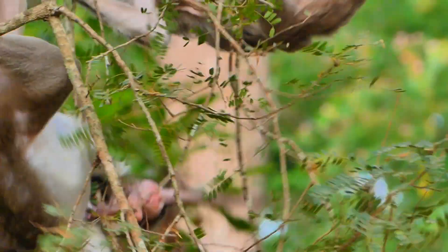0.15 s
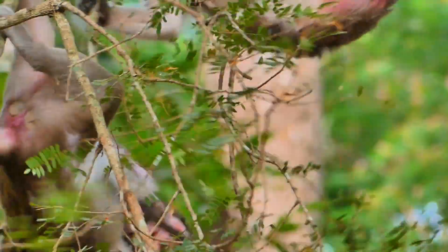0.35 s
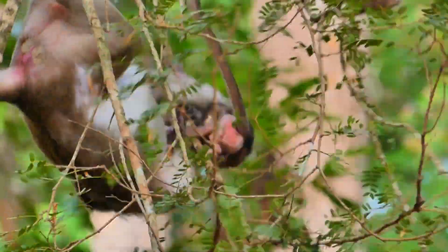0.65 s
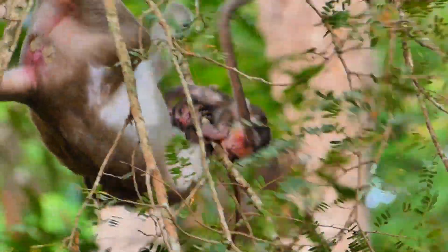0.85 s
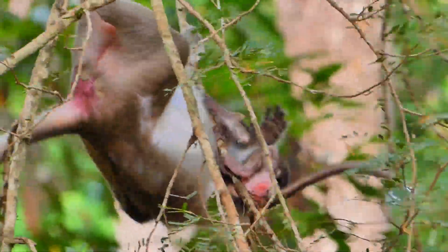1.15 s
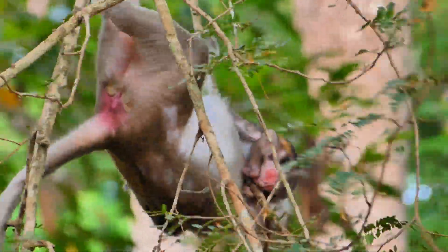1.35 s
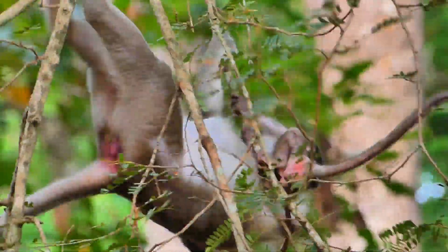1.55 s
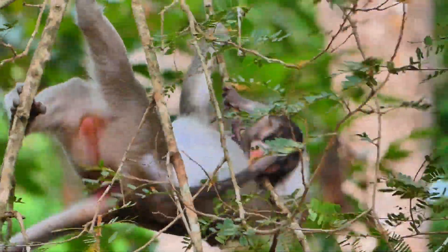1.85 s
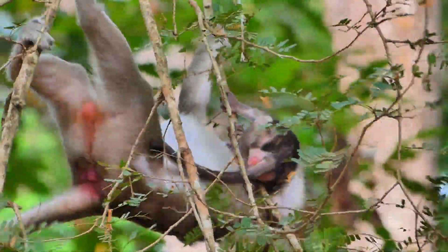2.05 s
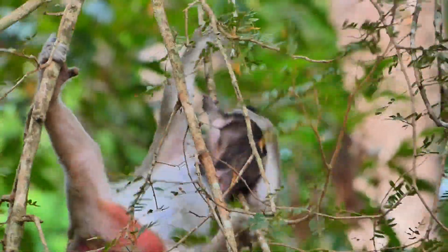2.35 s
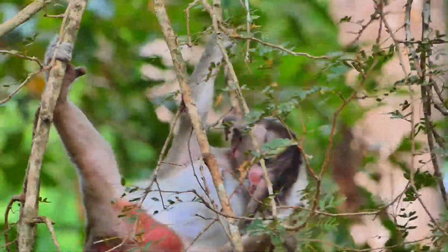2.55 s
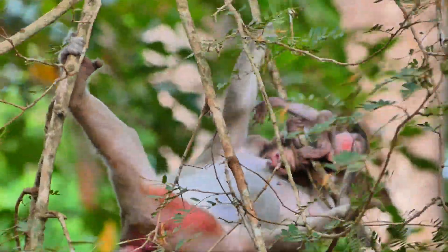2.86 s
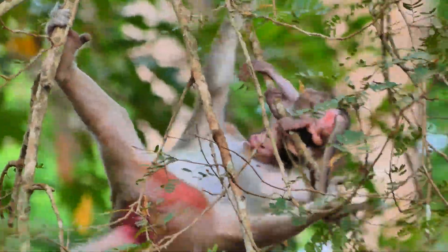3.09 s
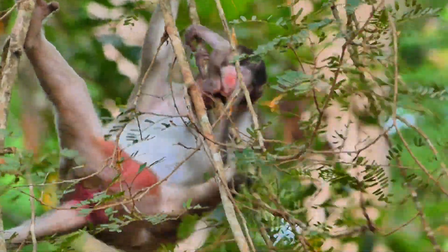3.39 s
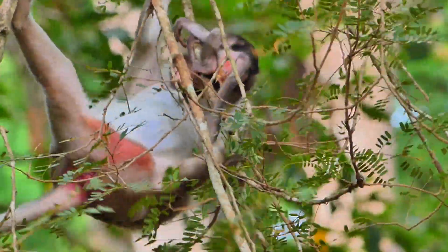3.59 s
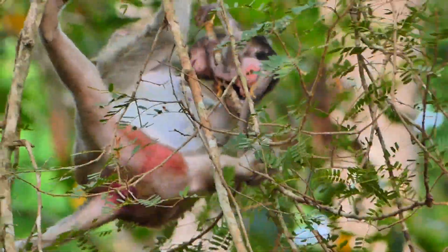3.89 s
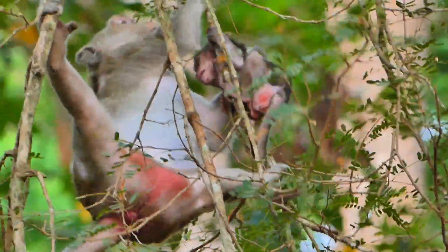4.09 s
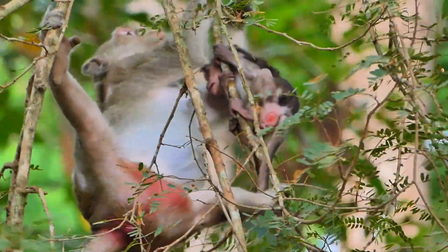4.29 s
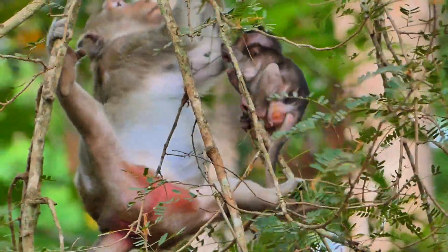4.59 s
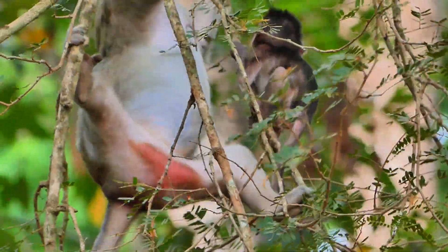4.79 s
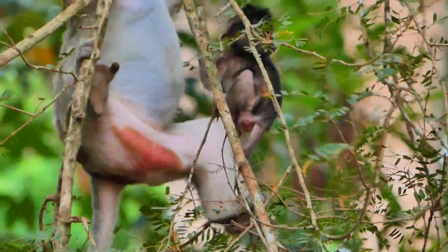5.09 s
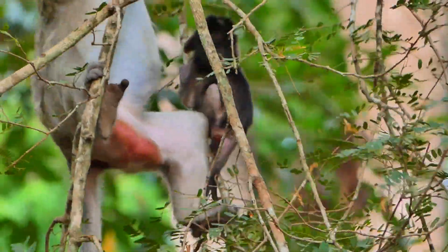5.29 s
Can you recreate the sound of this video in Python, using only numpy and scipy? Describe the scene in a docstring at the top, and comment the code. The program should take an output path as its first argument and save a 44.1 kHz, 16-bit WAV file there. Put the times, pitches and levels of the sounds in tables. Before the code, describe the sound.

Outdoors in a leafy grove, a hissing monkey screech ends in a tiny sharp squeak. Bark scrapes, leaves swish, twigs snap and branches knock in quick clusters for two seconds. The tree then settles; one clear high infant coo sounds, followed by softer rustles, scattered snaps and a last stronger shake. Faint birds and steady insect hiss lie behind. Close, nearly centred stereo with an airy woodland tail.

```python
"""A macaque and her infant clamber through a small tree: in every move bark scrapes, twigs crackle, leaves swish.
A hissing screech of rasping noise and noise whistles opens the scene and ends in a squeak of rough harmonics.
Meanwhile and after, resonant bursts snap twigs, decaying tones knock branches and noise strokes rub stems.
From 2.5 s a few faint gliding tones are birds; at 3.4 s harmonics make the infant's one high, arched coo.
Shaped noise is the steady forest hush throughout; reflections and a scattered tail give the space."""
import sys
import numpy as np
from scipy import signal
from scipy.fft import rfft, irfft, next_fast_len
from scipy.io import wavfile
from scipy.ndimage import uniform_filter1d, map_coordinates

SR = 44100
rng = np.random.default_rng(int(sys.argv[2]) if len(sys.argv) > 2 else 0)


def to_wav(s):
    """Save 16-bit WAV."""
    ch = np.atleast_2d(s).T  # columns
    pcm = np.round(np.clip(ch, -1, 1) * 32767)  # PCM
    wavfile.write(sys.argv[1], SR, pcm.astype(np.int16))


N = 239934  # length in samples


def amp(db):
    """Level law: decibels to amplitude gain."""
    return 10 ** (np.asarray(db) / 20)


def unit(x):
    """Normalisation by energy: scale to rms 1."""
    return x / np.sqrt(np.mean(x ** 2) + 1e-20)


def along(points, hz):
    """Logarithmic frequency scale: (Hz, value) points interpolated on a log axis."""
    point_hz, values = np.transpose(points)
    return np.interp(np.log(hz + 1), np.log(point_hz + 1), values)


def wobble(rate):
    """Band-limited random modulation: a smooth random curve with rate knots a second."""
    knots = rng.standard_normal(int(N * rate / SR) + 4)
    return map_coordinates(knots, [np.arange(N) * rate / SR])


def filtered(x, response):
    """Linear filtering: the spectrum of x times a response of frequency."""
    n = x.shape[-1]
    m = next_fast_len(n + 8192)  # padding leaves room for the filter's tail
    return irfft(rfft(x, m) * response(np.fft.rfftfreq(m, 1 / SR)), m)[..., :n]


def coloured(x, spectrum):
    """Spectral shaping: x filtered by (Hz, dB) points, at rms 1."""
    return unit(filtered(x, lambda hz: amp(along(spectrum, hz))))


def resonance(x, centre_hz, width_hz):
    """Damped resonator: x through one causal second-order resonance."""
    return filtered(x, lambda f: 1j * f * width_hz / (centre_hz ** 2 - f ** 2 + 1j * f * width_hz))


def resonance_pair(x, centre_hz, width_hz):
    """Cascaded resonators: the same resonance twice, for steeper skirts."""
    return resonance(resonance(x, centre_hz, width_hz), centre_hz, width_hz)


def add(track, s, sound):
    """Superposition: mix a short sound in at time s in seconds."""
    room = track[..., max(round(s * SR), 0):][..., :sound.shape[-1]]
    room += sound[..., :room.shape[-1]]


def swell(s, rise_s, fall_s, shape):
    """Envelope: a gain that is 1 at time s and 10 dB down rise_s before and fall_s after."""
    t = np.arange(N) / SR - s
    return amp(-10 * np.maximum(-t / rise_s, t / fall_s) ** shape)


def patchy(patchy_db):
    """Non-stationary noise: two unrelated noises share random gain patches in time and frequency."""
    z = signal.stft(rng.standard_normal((2, N)), nperseg=512)[2]
    field = uniform_filter1d(rng.standard_normal(z.shape[1:]), size=3, axis=0)
    field = uniform_filter1d(field, size=9, axis=1)
    return unit(signal.istft(z * amp(patchy_db * unit(field)), nperseg=512)[1][:, :N])


def rustle(colour, rate, spread_db, grain_db, flutter_db, patchy_db):
    """Stochastic friction: tiny slips of uneven size on a noise bed, fluttering together."""
    sizes = amp(spread_db * rng.uniform(-1.7, 1.7, N))
    slips = (rng.random(N) < rate / SR) * sizes * np.sign(rng.standard_normal((2, N)))
    flutter = amp(flutter_db * np.tanh(wobble(60) + wobble(170)))
    bed = patchy(patchy_db)
    return coloured(flutter * (bed + amp(grain_db) * unit(slips)), colour)


def call(pitch, rough, gains, jitter, smear_hz):
    """Additive voice: harmonics with the given gains; roughness smears each into a band of noise."""
    rough = np.clip(rough, 0, 1)
    phase = 2 * np.pi * np.cumsum(pitch * (1 + jitter * wobble(350))) / SR
    tone = np.zeros(N)
    for k, gain in enumerate(gains, 1):
        rasp = wobble(smear_hz) * np.sin(k * phase) + wobble(smear_hz) * np.cos(k * phase)
        tone += gain * (np.sqrt(1 - rough) * np.sin(k * phase) + np.sqrt(rough / 2) * rasp)
    return tone


# Spectra of rubbed bark, twigs and leaves. Each row: frequency in Hz, relative level in dB.
# The knocks' scuff also uses bark, the snaps' crack also uses leaves.
BARK_SPECTRUM = [(30, -60), (70, -77), (150, -17.5), (250, -21.5), (430, 2.5), (650, 3.5), (900, 0.5),
                 (1100, -3), (1350, 2), (1600, -0.5), (1850, -8), (2200, -15), (3500, -16), (8000, -68)]
TWIG_SPECTRUM = [(100, -59), (900, -19), (1700, -6), (2250, -5), (2700, -5.5), (3200, 2.5), (3700, -3.5),
                 (4200, 3), (5400, 0.5), (6000, -1.5), (6600, -11), (7600, -13), (11000, -24)]
LEAF_SPECTRUM = [(300, -58), (3000, -26), (6000, -2.5), (7300, -3.5), (8500, -5.5), (9800, -0.5),
                 (11000, -6), (12200, -11), (13200, -13.5), (15500, -33)]


def climbing():
    """Friction noise: bark gives the low scrape, twigs the crackle, leaves the swish."""
    on_bark, on_twigs, on_leaves = shaking()
    bark = on_bark * rustle(BARK_SPECTRUM, rate=220, spread_db=3.5, grain_db=-5.5,
                            flutter_db=2.0, patchy_db=1.5)
    twigs = on_twigs * rustle(TWIG_SPECTRUM, rate=520, spread_db=3.0, grain_db=-3.5,
                              flutter_db=1.5, patchy_db=3.0)
    leaves = on_leaves * rustle(LEAF_SPECTRUM, rate=580, spread_db=5.0, grain_db=-5.5,
                                flutter_db=2.06, patchy_db=2.5)
    return bark + twigs + leaves


# Each reach, step or pull of the monkeys shakes the tree. Each row: time of its height in seconds,
# rise in seconds, fall in seconds, twig level in dB, bark over twigs in dB, leaves over twigs in dB.
TREE_MOVES = [ (0.06, 0.092, 0.12, -50, 2, -6), (0.22, 0.11, 0.13, -47, -1.5, 0.5),
              (0.44, 0.055, 0.094, -51, -3.5, -0.5), (0.505, 0.029, 0.0313, -45, -6, -2.5),
              (0.58, 0.034, 0.11, -58.5, 8.5, -10), (0.73, 0.11, 0.13, -43.5, 1.5, -1.5),
              (0.855, 0.03, 0.13, -50, 1.5, -7), (1.08, 0.13, 0.2, -50, 1, -1.5),
              (1.335, 0.036, 0.04, -40, -3, -3.5), (1.375, 0.057, 0.069, -41, -3, -2.5),
              (1.52, 0.21, 0.25, -56, 3, -3), (1.77, 0.13, 0.055, -46, -2, -4),
              (1.899, 0.055, 0.026, -41, -0.5, -4), (2.04, 0.33, 0.12, -59.5, -2, 0),
              (2.44, 0.73, 0.14, -61, 1, -8), (3.1, 0.09, 0.11, -57.5, -0.5, 2.5),
              (3.27, 0.23, 0.46, -57, -2.5, -4.5), (3.52, 0.054, 0.16, -47.5, -10, -2.5),
              (3.86, 0.31, 0.28, -51.5, -3, -4), (4.48, 0.2, 0.19, -53.5, 2.5, -4.5),
              (5.0, 0.2, 0.067, -56.5, 5, -7), (5.16, 0.18, 0.14, -49, -2.5, -2.5),
              (5.35, 0.11, 0.247, -46, -4, -4)]
# The tree never comes quite to rest. One row: resting level of bark in dB, of twigs in dB, of leaves in dB.
RESTING_LEVELS = (-67.5, -63, -71.5)


def shaking():
    """Energy addition: moves swell and settle in bark, twigs and leaves, and their powers sum."""
    power = amp(RESTING_LEVELS)[:, None] ** 2
    for s, rise_s, fall_s, twig_db, bark_db, leaves_db in TREE_MOVES:
        heights = amp([twig_db + bark_db, twig_db, twig_db + leaves_db])
        # shape 1 gives a pointed swell, 2 a rounded one
        power = power + np.outer(heights, swell(s, rise_s, fall_s, shape=1.1)) ** 2
    return np.sqrt(power)


# Twigs snapping. Each row: start in seconds, peak level in dB, pitch in Hz,
# bright crack over the twig's ring in dB before the common crack gain, burst decay t60 in seconds.
TWIG_SNAPS = [(0.5018, -35, 2700, -23, .02), (0.681, -32, 2150, -30, .014), (1.088, -38, 4400, -16, .012),
              (1.167, -39, 2750, -30, .02), (1.366, -26, 4400, -24, 0.0088), (1.379, -28, 3400, -26, 0.015),
              (1.536, -38, 4300, -24, .017), (1.566, -34, 3600, -28, 0.016),
              (1.623, -34.5, 3320, -26, 0.011), (1.88, -32.5, 4200, -22, .014),
              (1.906, -33.5, 3970, -22, .012), (2.047, -38, 4000, -20, .007),
              (2.065, -37.5, 2040, -15, 0.0089), (2.1067, -39, 3680, -30, 0.0063),
              (2.345, -34, 5450, -11, 0.011), (2.43, -38, 2440, -2, 0.011), (3.668, -39, 3360, -21, 0.023),
              (3.767, -39, 5050, -10, 0.019), (4.0432, -35.5, 4080, -12, .012),
              (4.3241, -38, 2000, -22, .011), (4.352, -33.5, 6550, -24, 0.011),
              (4.4183, -32.5, 5420, -1, .012), (4.4786, -37.5, 3900, -16, 0.013),
              (4.56, -39, 3300, -28, .018), (4.581, -40, 3350, -21, .018), (4.7305, -36.5, 3120, -29, .009),
              (4.84, -37.5, 2760, -13, 0.014), (5.3396, -32, 4650, -22, .012), (5.378, -39, 4200, -22, .01),
              (5.4285, -32.5, 4800, -24, 0.014)]


def snaps(damping=0.55, crack_db=13.0):
    """Impulsive excitation: breaking fibres burst, ring the twig and add a bright crack."""
    out, t = np.zeros((2, N)), np.arange(SR // 20) / SR
    for s, peak_db, hz, bright_db, t60 in TWIG_SNAPS:
        burst = rng.standard_normal((2, len(t))) * amp(-60 * t / t60)
        twig = unit(resonance_pair(burst, hz, damping * hz))
        crack = amp(bright_db + crack_db) * coloured(burst, LEAF_SPECTRUM)
        snap = twig + crack
        add(out, s, amp(peak_db) * snap / np.abs(snap[0]).max())
    return out


# Branches knocking. Each row: start in seconds, peak level in dB before the common gain and high-pass,
# pitch in Hz, ring t60 in seconds, hardness in dB, which raises the stem's ring and the scuff.
BRANCH_KNOCKS = [(0.504, -35.5, 575, 0.032, -2), (0.554, -33, 730, 0.025, -7),
                 (0.665, -29.5, 660, 0.035, -9), (0.696, -35, 1150, 0.016, -2),
                 (0.718, -33, 780, 0.013, -7), (0.839, -35, 600, 0.028, -6), (0.848, -30, 930, .04, -2),
                 (0.859, -30.5, 680, 0.033, 2), (0.875, -35, 750, .02, -5), (0.9586, -29.5, 864, 0.014, 0),
                 (0.977, -39, 1390, 0.031, -5), (1.031, -32.5, 543, 0.022, 4), (1.051, -37, 1100, 0.015, 3),
                 (1.108, -31.5, 560, 0.018, 3), (1.113, -32.5, 497, 0.023, -4), (1.139, -39, 640, .018, 2),
                 (1.127, -37, 626, 0.041, -15), (1.312, -37, 1360, 0.025, 4), (1.484, -33, 1420, 0.013, 0),
                 (1.5101, -29.5, 766, 0.014, -4), (1.625, -38, 514, 0.028, -1),
                 (1.775, -35, 1390, 0.021, -2), (1.868, -35, 830, 0.022, 2), (1.895, -33, 750, .018, -11),
                 (1.903, -32, 734, 0.02, -3), (1.912, -31, 760, 0.015, -2), (2.065, -38.5, 730, 0.016, 1),
                 (2.3458, -39, 880, 0.016, -12), (2.461, -41.5, 643, 0.055, -14),
                 (4.3241, -40, 1290, 0.016, -2), (4.73, -41, 1346, 0.014, 5), (5.004, -42, 620, 0.028, -10),
                 (5.4115, -27, 660, 0.025, -8)]
STEM_HZ, STEM_DB = 1390, -3.5  # the stem's answer, before hardness is added


def knocks(scuff_t60=0.033, scuff_db=-9, knock_db=-2):
    """Modal impact: green wood rings for a few cycles only; the stem answers and the bark scuffs."""
    out, t = np.zeros(N), np.arange(SR // 10) / SR
    onset = 1 - np.exp(-t / .0005)  # time constant in seconds
    for s, peak_db, pitch_hz, t60, hard_db in BRANCH_KNOCKS:
        branch = np.sin(2 * np.pi * pitch_hz * t)
        stem = amp(STEM_DB + hard_db) * np.sin(2 * np.pi * STEM_HZ * t)
        ring = (branch + stem) * amp(-60 * t / t60)
        scuff_gain = amp(scuff_db + hard_db - 60 * t / scuff_t60)
        scuff = coloured(rng.standard_normal(len(t)), BARK_SPECTRUM) * scuff_gain
        blow = (ring + scuff) * onset
        add(out, s, amp(peak_db + knock_db) * blow / np.abs(blow).max())
    # thin branches radiate little bass
    return signal.sosfilt(signal.butter(N=2, Wn=300, btype="high", fs=SR, output="sos"), out)


# Strokes that rub one stem into its resonance. Each row: start in seconds, length in seconds,
# pitch in Hz, width of each of the two resonances in Hz, rms level in dB before the swell.
STEM_STROKES = [(0.422, 0.21, 2280, 800, -53), (0.652, 0.086, 2240, 900, -42),
                (0.693, 0.12, 2330, 1000, -48.5), (0.638, 0.11, 600, 347, -47.5),
                (0.673, 0.095, 1360, 450, -46.5), (0.759, 0.16, 1380, 398, -50),
                (0.978, 0.28, 1320, 400, -55), (1.04, 0.06, 2500, 900, -53), (1.045, 0.047, 1400, 450, -50),
                (1.31, 0.11, 1380, 445, -43), (1.329, 0.099, 3070, 800, -43.5),
                (1.332, 0.062, 5330, 1400, -41.5), (1.463, 0.11, 3300, 700, -52.5),
                (1.861, 0.069, 1750, 1000, -45), (3.478, 0.24, 1800, 600, -55.5),
                (5.308, 0.067, 4240, 1100, -50)]


def strokes():
    """Friction-driven resonance: a stem sliding through a grip swells and fades around its pitch."""
    out = np.zeros((2, N))
    for s, length_s, hz, width_hz, db in STEM_STROKES:
        n = int(length_s * SR)
        rub = resonance_pair(rng.standard_normal((2, n)), hz, width_hz)
        add(out, s, amp(db) * np.sin(np.linspace(0, np.pi, n)) * unit(rub))
    return out


# Spectrum of the screech's rasp. Each row: frequency in Hz, relative level in dB.
RASP_SPECTRUM = [(100, -70), (1500, -22), (3000, -13), (3600, -5), (4500, 4), (5200, 0), (6800, 1.5),
                 (7600, -3.5), (8600, 1), (12000, -9), (15500, -20.5)]
# Breathy whistles that flare up in the screech. Each row: time of its height in seconds, rise in seconds,
# fall in seconds, centre in Hz, width of each of the two resonances in Hz, rms level at its height in dB.
BREATH_WHISTLES = [(0.012, .04, 0.022, 3740, 520, -33), (0.026, .05, 0.031, 4400, 520, -36),
                   (0.057, 0.036, 0.06, 10700, 2800, -32), (0.047, .025, .03, 2410, 190, -48),
                   (0.16, 0.043, 0.055, 3880, 1000, -40), (0.15, 0.059, 0.051, 10200, 2400, -38.5),
                   (0.1975, 0.028, 0.019, 5860, 2300, -30), (0.215, 0.028, 0.028, 2420, 530, -45.5)]
# the rasp sags from its starting level while held, then dies away faster
RASP_DB, RASP_SAG_DB_PER_S, RASP_END_S, RASP_RELEASE_DB_PER_S = -32.5, 39, 0.228, 172
CRY_WIDTH_DB = -3.5  # cut of its side signal: the screech is narrower than the rustle


def screech():
    """Turbulent source: a strained, unvoiced cry of rasping air in which breathy whistles flare up."""
    t = np.arange(N) / SR
    rasp_db = RASP_DB - RASP_SAG_DB_PER_S * t
    rasp_db = rasp_db - RASP_RELEASE_DB_PER_S * np.maximum(t - RASP_END_S, 0)
    # grainy and uneven
    cry = amp(rasp_db) * rustle(RASP_SPECTRUM, rate=650, spread_db=2.5, grain_db=-7,
                                flutter_db=1.3, patchy_db=2.2)
    for s, rise_s, fall_s, hz, width_hz, db in BREATH_WHISTLES:
        whistle = unit(resonance_pair(patchy(patchy_db=1.0), hz, width_hz))
        cry = cry + amp(db) * swell(s, rise_s, fall_s, shape=1.6) * whistle
    mid_side_gain = amp(CRY_WIDTH_DB * np.arange(2))[:, None]
    return cry * amp(0.45 * wobble(247)) * mid_side_gain


# Response of the squeak's tight throat. Each row: frequency in Hz, level in dB.
THROAT_RESPONSE = [(2300, -24), (4550, 0.5), (6800, -3), (9100, -37), (14000, -35)]
# the squeak slides down onto its pitch and is clear only at its height
SQUEAK_S, SQUEAK_HZ, SQUEAK_DB = 0.202, 2290, -20
SQUEAK_RISE_S, SQUEAK_FALL_S, SQUEAK_SLIDE_HZ_PER_S = 0.008, 0.0093, 4700


def squeaking(faint_rough=1.0, count=5):
    """Source and filter: a sharp voiced spike at the screech's end, rough on either side."""
    effort = swell(SQUEAK_S, SQUEAK_RISE_S, SQUEAK_FALL_S, shape=0.94)
    time_left = np.maximum(SQUEAK_S - np.arange(N) / SR, 0)
    pitch = SQUEAK_HZ + SQUEAK_SLIDE_HZ_PER_S * time_left
    gains = [amp(along(THROAT_RESPONSE, k * pitch)) for k in range(1, count + 1)]
    rough = faint_rough * (1 - effort) ** 2
    return amp(SQUEAK_DB) * effort * call(pitch, rough, gains, jitter=0.0074, smear_hz=694)


# The coo starts slack, breaks upward, holds and drops. Each row: time in seconds, pitch in Hz.
COO_CONTOUR = [(3.399, 830), (3.434, 900), (3.445, 1060), (3.461, 1110), (3.476, 1130), (3.503, 1120),
               (3.54, 1138), (3.567, 1127), (3.603, 1110), (3.62, 1020), (3.638, 900)]
# The coo's harmonics from the first up, before the common swelling.
# Each row: level while slack in dB, level once clear in dB, release in seconds.
COO_PARTIALS = [(-68, -67, .03), (-51.5, -55, .06), (-55, -41, .058), (-52.5, -42, .03), (-65, -49.5, .045),
                (-61, -55.5, .05), (-68, -63, .05), (-59, -70, .05)]
COO_BREAK_S, COO_BREAK_LENGTH_S = 3.434, 0.034  # the voice flips from slack to clear
COO_SLACK_ROUGH, COO_CLEAR_ROUGH = .15, .018  # noise share of the energy
COO_ATTACK_S, COO_GROWS_DB_PER_S = 0.0088, 10  # the held note keeps swelling


def cooing(waver=.0012, shimmer_db=0.5):
    """Register break: the infant's slack voice turns clear; each harmonic has its own release."""
    t = np.arange(N) / SR
    times, hz = np.transpose(COO_CONTOUR)
    pitch = np.interp(t, times, hz) * (1 + waver * wobble(60))
    clear = np.sin(np.pi / 2 * np.clip((t - COO_BREAK_S) / COO_BREAK_LENGTH_S, 0, 1))
    gains = []
    for slack_db, clear_db, release_s in COO_PARTIALS:
        release = np.clip((times[-1] - t) / release_s, 0, 1) ** 2
        gains.append(amp(slack_db + (clear_db - slack_db) * clear) * release)
    rough = COO_SLACK_ROUGH + (COO_CLEAR_ROUGH - COO_SLACK_ROUGH) * clear
    attack = np.clip((t - times[0]) / COO_ATTACK_S, 0, 1)
    growth_db = COO_GROWS_DB_PER_S * (t - times.mean())
    effort = attack * amp(growth_db + shimmer_db * wobble(39.8))
    return effort * call(pitch, rough, gains, jitter=0.002, smear_hz=406)


# Distant bird notes. Each row: start in seconds, length in seconds, start pitch in Hz,
# end pitch in Hz, level in dB before fade and flicker.
BIRD_NOTES = [(2.472, 0.022, 4120, 4180, -50), (2.628, 0.082, 5300, 7300, -50.5),
              (2.89, 0.24, 9100, 10200, -66), (3.14, 0.22, 3070, 3030, -56), (4.03, 0.17, 3390, 3190, -60),
              (4.06, 0.08, 2340, 2290, -60), (4.2, 0.12, 3040, 2990, -58), (4.21, 0.17, 2270, 2290, -55.5),
              (4.625, 0.045, 5370, 5650, -51.5), (4.76, .09, 2410, 2490, -59), (4.965, .05, 1000, 930, -52),
              (4.985, .05, 2240, 2180, -56)]


def birds(fade_db=5, blur=.006, flicker_db=3.5):
    """Frequency modulation: thin, far whistles glide and fade, flickering through the foliage."""
    out = np.zeros(N)
    for s, length_s, start_hz, end_hz, db in BIRD_NOTES:
        u = np.linspace(0, 1, int(length_s * SR))
        glide = start_hz + (end_hz - start_hz) * u ** 2
        pitch = glide * (1 + blur * wobble(193)[:len(u)])
        envelope = amp(db - fade_db * u ** 2) * np.abs(np.sin(np.pi * u)) ** .5
        add(out, s, envelope * np.sin(2 * np.pi * np.cumsum(pitch) / SR))
    return out * amp(flicker_db * np.tanh(wobble(100)))


# Spectra of the far murmur and of the insects. Each row: frequency in Hz, relative level in dB.
MURMUR_SPECTRUM = [(15, -75), (25, -63), (70, -36.5), (140, -20), (196, -19), (265, -12.5), (415, -4),
                   (550, -9), (815, -3.5), (1060, -5.5), (1430, -15.5), (1800, -13.5), (2100, -25.5),
                   (2860, -28), (4840, -87)]
INSECT_SPECTRUM = [(200, -62), (1300, -15), (2150, -1.5), (2700, -2.5), (3200, 2), (3780, -9.5),
                   (4350, -6.5), (5250, 2), (6150, 0.5), (7250, -2), (7650, -10), (10100, -14.5),
                   (12100, -19.5), (15400, -22)]
MURMUR_DB, INSECTS_DB, INSECTS_SWAY_DB = -56.5, -53, 0.7


def forest():
    """Diffuse noise field: a steady far murmur of air and foliage, and the hiss of insects."""
    murmur = amp(MURMUR_DB) * coloured(patchy(patchy_db=2.5), MURMUR_SPECTRUM)
    insects_gain = amp(INSECTS_DB + INSECTS_SWAY_DB * wobble(3.79))
    return murmur + insects_gain * coloured(patchy(patchy_db=2.0), INSECT_SPECTRUM)


# Nearby trunks and the ground. Each row: delay in seconds, level in dB.
EARLY_REFLECTIONS = [(0.0031, -34), (0.0083, -23.5), (0.019, -17), (0.034, -17)]


def reflected(x):
    """Early reflection: the direct sound plus a few delayed copies."""
    return filtered(x, lambda hz: 1 + sum(amp(db) * np.exp(-2j * np.pi * hz * s)
                                          for s, db in EARLY_REFLECTIONS))


# The answer of the trees. Each row: frequency in Hz, t60 in seconds.
GROVE_DECAY = [(200, 0.33), (2000, 0.86), (6000, 0.87), (12000, 0.62)]


def grove(x):
    """Reverberation: trunks and foliage scatter a tail that decays at a rate set by frequency."""
    hz, t, z = signal.stft(rng.standard_normal((2, SR // 2)), SR, nperseg=256)
    decay = amp(-60 * t / along(GROVE_DECAY, hz)[:, None])
    tail = signal.istft(z * decay, SR, nperseg=256)[1]
    return signal.fftconvolve(x[None], tail / np.linalg.norm(tail[0]), axes=1)[:, :N]


# Stereo width. Each row: frequency in Hz, gain of the side signal in dB.
SIDE_GAIN = [(30, -7), (130, -12), (300, -15), (1000, -19), (6800, -21), (8200, -11.5), (14000, -2.5)]


def scene():
    """Mid-side stereo: squeak, coo, knocks and direct bird notes straight ahead, the rest spread."""
    cry, cracks, notes = screech(), snaps(), birds()
    squeak, coo = squeaking(), cooing()
    ahead = squeak + coo + knocks() + notes
    voices_sent = amp(-8.0) * cry[0] + amp(-12.5) * squeak + amp(-10.0) * coo
    echo = grove(voices_sent + amp(-6.5) * cracks[0] + amp(-13) * notes)
    mid, side = reflected(climbing() + cry) + strokes() + forest() + cracks + echo
    side = filtered(side, lambda hz: amp(along(SIDE_GAIN, hz)))
    return np.array([mid + ahead + side, mid + ahead - side])


TOP_HZ = 15500


def record(dry):
    """Band limiting: nothing at or above TOP_HZ passes."""
    return filtered(dry, lambda hz: hz < TOP_HZ)


dry = scene()
out = record(dry)
to_wav(out)
```